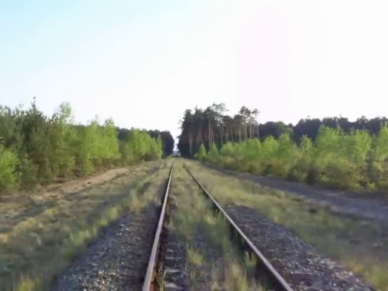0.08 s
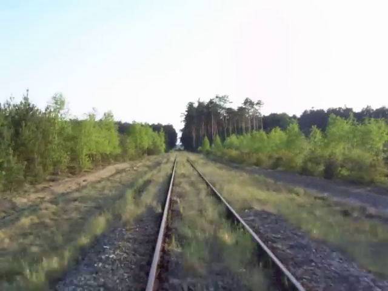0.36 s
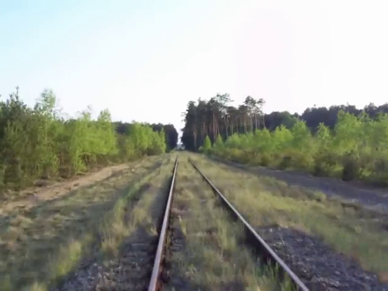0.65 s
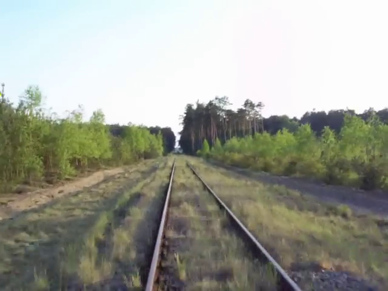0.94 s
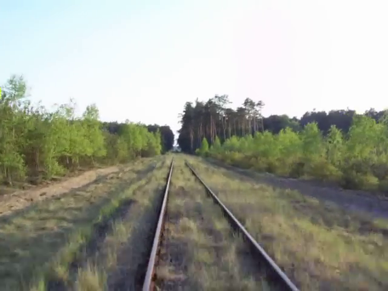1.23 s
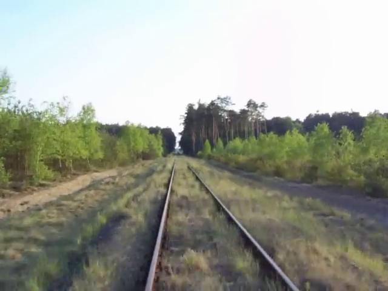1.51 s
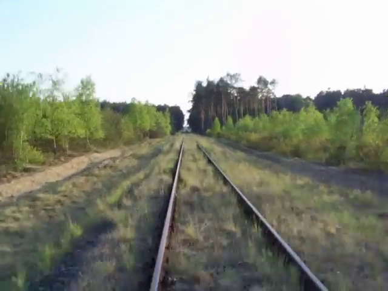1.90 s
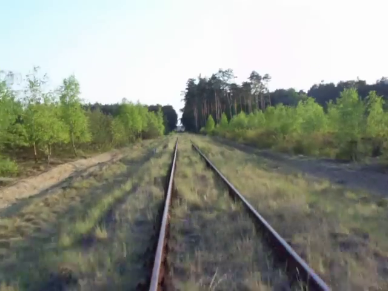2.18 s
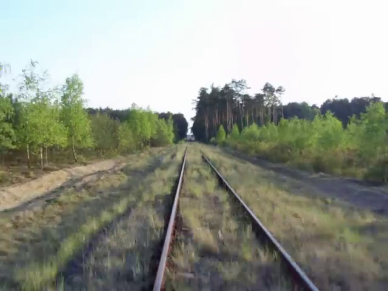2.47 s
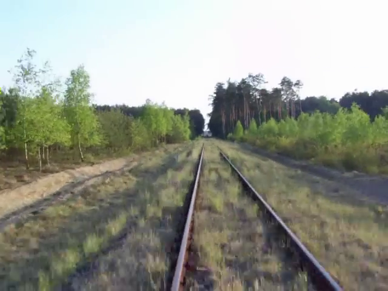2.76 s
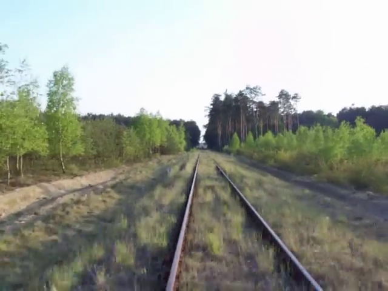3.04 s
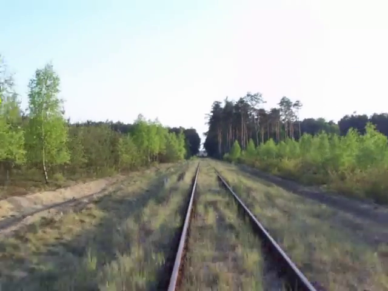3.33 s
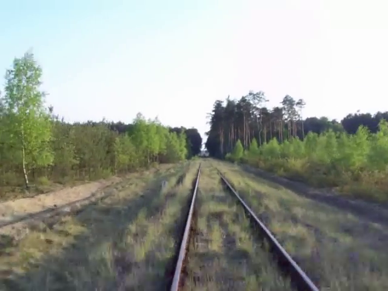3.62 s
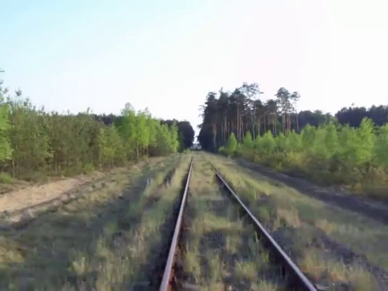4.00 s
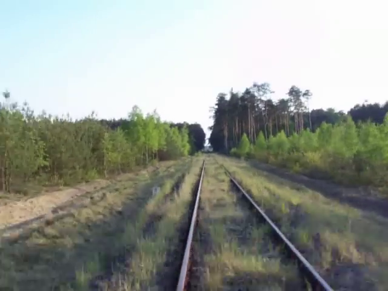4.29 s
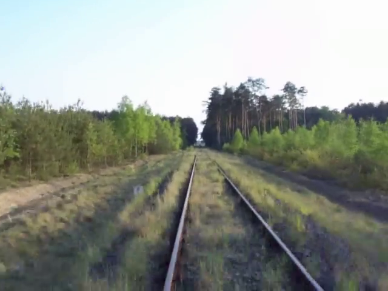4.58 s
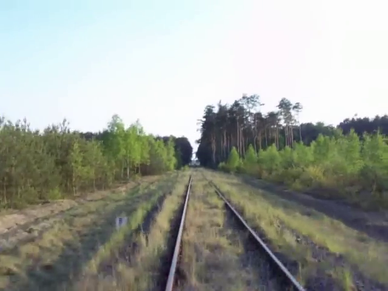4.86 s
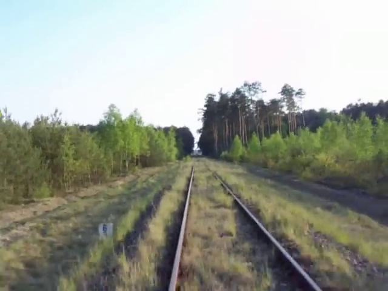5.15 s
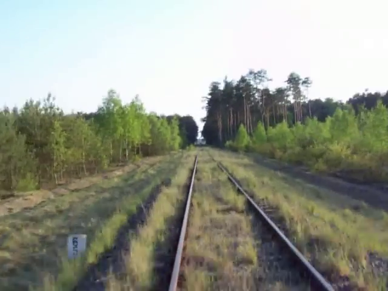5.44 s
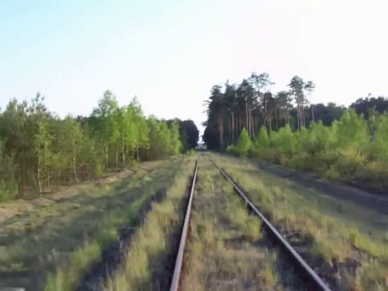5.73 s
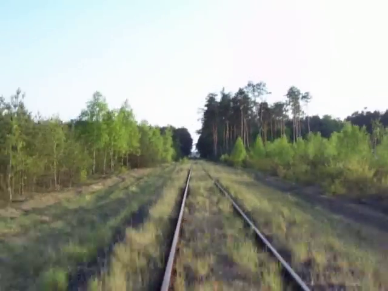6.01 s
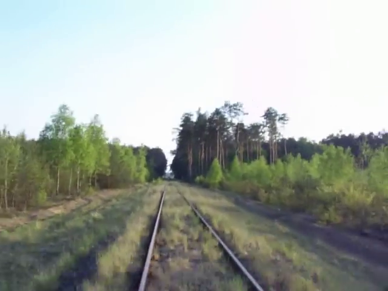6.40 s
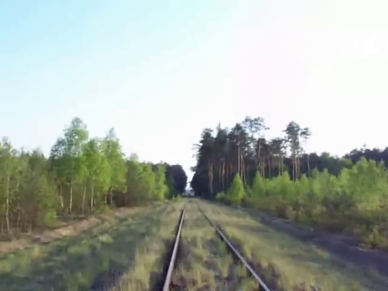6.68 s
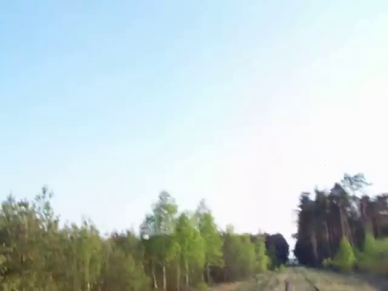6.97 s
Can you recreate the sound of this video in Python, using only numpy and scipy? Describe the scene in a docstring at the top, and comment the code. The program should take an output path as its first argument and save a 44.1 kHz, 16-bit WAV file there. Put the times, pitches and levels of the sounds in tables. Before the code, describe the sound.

Heard from on board, a small motor trolley drones along, then rumbles, knocks and rattles louder over rusty rails.

```python
"""One-cylinder engine of a small motor trolley on an overgrown track, heard from on board.
Exhaust pulses drone through a muffler; block and panels clatter once a turn.
After 2 s the wheels knock onto rough, rusty rail: the chassis bounces, the deck rumbles,
grit cracks and rings the wheels, a flange squeaks, loose parts rattle and clank on the frame."""
import sys
import numpy as np
from scipy import signal
from scipy.fft import rfft, irfft
from scipy.io import wavfile
from scipy.ndimage import uniform_filter1d

SR = 44100
rng = np.random.default_rng(int(sys.argv[2]) if len(sys.argv) > 2 else 0)


def master(y):
    """Save y as 16-bit WAV."""
    cut = np.clip(np.atleast_2d(y).T, -1, 1)
    pcm = np.round(cut * 32767)  # scale
    wavfile.write(sys.argv[1], SR, pcm.astype(np.int16))


N = 309141
T = np.arange(N) / SR
ROUGH_FROM_S = 2.055

# response of wheels and deck (frequency [Hz], gain [dB])
DECK_RESPONSE = [(40, -17), (110, -7), (180, 2), (280, 1.5), (420, 0.5), (700, -3), (930, -4), (1080, -6),
                 (1500, -8), (1900, -11.5), (2700, -25.5), (4000, -36), (9000, -75)]
# uneven stretches of rail (time [s], bounce change [dB], rumble change [dB])
RAIL_HUMPS = [(2.43, 3, 3), (2.52, 3.5, 3.5), (2.82, 5, 2), (3.02, 5, 1), (3.15, -4, 3), (3.32, 5.5, -1),
              (3.8, 8.5, 2), (4.03, 1, 2), (4.45, 3, 2), (5.52, 7.5, 0.5), (5.63, 4, 1), (5.95, 6.5, 2),
              (6.26, 7, 2), (6.42, -4, 11.5), (6.555, 1, 10), (6.74, 8, 2), (6.99, 6, 4.5)]
HUMP_S = 0.082


def undb(db):
    """Decibels to gain."""
    return 10 ** (np.asarray(db) / 20)


def level(x, db=0):
    """Scale to an rms level."""
    return x * undb(db) / np.sqrt(np.mean(x ** 2))


def curve(points):
    """Control signal from (time, value) points."""
    return np.interp(T, *np.transpose(points))


def ramp(start_s, length_s):
    """Linear rise from 0 to 1."""
    return np.clip((T - start_s) / length_s, 0, 1)


def swell(centre_s, length_s):
    """Gaussian rise and fall."""
    return np.exp(-(2 * (T - centre_s) / length_s) ** 2)


def jolt(settle_s=0.1):
    """Shake from meeting the rough rail: 1 until then, settling after."""
    return np.exp(-np.maximum(T - ROUGH_FROM_S, 0) / settle_s)


def walk(rate_hz):
    """Random steps, smoothed twice; unit rms."""
    hold = int(SR / rate_hz)
    steps = np.repeat(rng.standard_normal(N // hold + 1), hold)
    return level(uniform_filter1d(uniform_filter1d(steps, hold), hold)[:N])


def colour(x, response, size=8192):
    """Minimum-phase filter from (frequency [Hz], gain [dB]) points."""
    hz, db = np.transpose(response)
    grid_hz = np.maximum(np.arange(size // 2 + 1) * SR / size, 1)
    gain = undb(np.interp(np.log(grid_hz), np.log(hz), db))
    cepstrum = irfft(np.log(gain))
    cepstrum[1:size // 2] *= 2
    cepstrum[size // 2 + 1:] = 0
    impulse_response = irfft(np.exp(rfft(cepstrum)))
    return signal.fftconvolve(x, impulse_response)[:N]


def ring(x, modes, order=1):
    """Parallel resonances (frequency [Hz], width [Hz], gain [dB]); higher order, steeper flanks."""
    out = np.zeros(N)
    for hz, width_hz, db in modes:
        section = np.concatenate(signal.iirpeak(hz, hz / width_hz, fs=SR))
        out += undb(db) * signal.sosfilt([section] * order, x)
    return out


def impacts(per_s, spread_db):
    """Random tiny impacts, most weak, a few strong; unit rms."""
    size = undb(spread_db * np.minimum(rng.exponential(size=N), 5))
    hits = rng.random(N) < per_s / SR
    return level(hits * size * rng.choice([-1, 1], N))


def once_a_turn(turns, lead_turns, sharpness):
    """Smooth burst just ahead of each exhaust pulse."""
    return np.exp(sharpness * (np.cos(2 * np.pi * (turns + lead_turns)) - 1))


def flange():
    """A flange brushes the rail; a wheel mode sings, wavering with the uneven contact."""
    # flange contacts (time [s], length [s], pitch [Hz], level [dB])
    squeaks = [(2.84, .05, 4726, -41), (2.98, .12, 4726, -40), (5.21, .06, 5155, -41),
               (5.48, .05, 5155, -40), (6.16, .05, 4726, -37), (6.315, .05, 4726, -32),
               (6.435, .06, 4726, -36)]
    out = np.zeros(N)
    for at_s, length_s, hz, db in squeaks:
        phase = 2 * np.pi * np.cumsum(hz + 18 * walk(170)) / SR
        tone = np.sin(phase) * undb(2.1 * walk(90))
        out += level(tone, db) * swell(at_s, length_s)
    return out


def crunches():
    """Coarse grains burst under a wheel in short, bright showers."""
    # grit patches (time [s], length [s], level [dB])
    patches = [(2.135, 0.12, -31), (2.695, 0.034, -36), (3.697, 0.028, -31), (5.077, 0.038, -34),
               (5.297, .02, -34), (5.467, 0.038, -31), (6.267, .08, -34), (6.84, .03, -35)]
    # grain spectrum (frequency [Hz], gain [dB])
    spectrum = [(1500, -29.5), (3500, -25.5), (5200, 6.5), (6000, -1.5), (7300, 2.5), (8200, -6.5)]
    grains = level(colour(impacts(per_s=5600, spread_db=4.5), spectrum))
    return grains * sum(undb(db) * swell(at_s, length_s) for at_s, length_s, db in patches)


def clanks(decay_s=0.0079):
    """Short steel-on-steel chatter rings the upper panels."""
    # loose part hitting the frame (time [s], level [dB])
    hits = [(2.068, -19.5), (4.748, -22.5), (6.51, -24), (6.648, -19), (6.708, -24), (6.778, -24),
            (6.865, -20), (6.888, -19), (6.957, -25)]
    # upper panel modes (frequency [Hz], width [Hz], gain [dB])
    modes = [(1700, 120, -3.0), (2100, 160, -4.0), (2290, 120, 2.0), (3460, 90, -16)]
    chatter = level(ring(impacts(per_s=5000, spread_db=0), modes))
    return chatter * sum((T > at_s) * undb(db) * np.exp(-np.abs(T - at_s) / decay_s) for at_s, db in hits)


def knocks(crack_s=0.0049, thud_s=0.012, thud_hz=78):
    """Each rail bump sends a crack through the deck and a thud through the chassis."""
    # rail bumps (time [s], gain [dB], extra thud gain [dB])
    bumps = [(2.058, -12, 7), (2.34, -11.5, -5), (2.421, -13, -3), (3.155, -16, -9), (3.544, -14.5, 3),
             (3.811, -13, -3), (4.75, -16, 5), (5.021, -12, -10), (5.599, -17, -3), (5.786, -12, -14),
             (6.412, -19, -8), (6.538, -16, -6), (6.99, -14, 1)]
    crack_envelope, thuds = np.zeros(N), np.zeros(N)
    for at_s, db, thud_db in bumps:
        age_s = np.maximum(T - at_s, 0)
        crack_envelope += (T > at_s) * undb(db) * np.exp(-age_s / crack_s)
        thuds += undb(db + thud_db) * np.exp(-age_s / thud_s) * np.sin(2 * np.pi * thud_hz * age_s)
    deck_noise = level(colour(rng.standard_normal(N), DECK_RESPONSE), -1)
    return crack_envelope * deck_noise + undb(-8) * thuds


def rattle(turns):
    """Engine shake throws loose parts against the panels, hardest in one late bout."""
    # struck panel modes (frequency [Hz], width [Hz], gain [dB])
    frame_modes = [(912, 72, 0.5), (1228, 25, 2.5), (1278, 28, 4.5), (1688, 100, 0.5), (2115, 220, 2.5),
                   (2315, 74, -2.5), (2560, 19, -9.5)]
    shake = 1.6 + once_a_turn(turns, lead_turns=0.02, sharpness=1.2)
    taps = impacts(per_s=2600, spread_db=2.0) * shake
    bout = swell(centre_s=6.87, length_s=0.3)
    gain_db = -32.3 + 4 * jolt() + 6.5 * bout + 0.78 * walk(7)
    return level(ring(taps, frame_modes), 2.5) * undb(gain_db)


def grit():
    """Rust and grit crack under the treads and ring the steel wheels."""
    # crushed grit spectrum (frequency [Hz], gain [dB])
    spectrum = [(300, -10.5), (1500, 3.5), (2600, -2), (2900, 1.5), (3600, 3), (3900, -1.5), (4400, 1.5),
                (5100, 0), (5500, -3.5), (6200, -7), (7300, -14), (8000, -15.5), (9000, -18.5)]
    # wheel modes (frequency [Hz], width [Hz], gain [dB])
    wheel_modes = [(1240, 16, 8.5), (2670, 29, -7), (3520, 35, -5), (4726, 20, 1), (4949, 25, -4),
                   (5156, 16, 1.5), (6336, 25, -8), (6900, 100, -7.5), (7250, 100, -7)]
    # grit along the rail (time [s], gain [dB])
    amount = [(2.2, -33), (2.85, -31), (3.3, -32.5), (3.7, -32), (4.1, -34), (5.0, -32), (5.85, -31.5),
              (6.26, -27.5), (6.35, -32), (6.79, -35), (6.86, -30), (7.0, -34.5)]
    cracks = impacts(per_s=12000, spread_db=3.0) * undb(1.7 * walk(60))
    wheel_hits = impacts(per_s=3000, spread_db=6.5) * undb(1.3 * walk(12))
    crackle = level(colour(cracks, spectrum))
    ringing = level(ring(wheel_hits, wheel_modes), -6)
    return (crackle + ringing) * undb(curve(amount) + 0.35 * walk(12))


def bounce():
    """Pitted rail bounces the chassis; the first jolt and the humps vary the level."""
    # chassis response (frequency [Hz], gain [dB])
    chassis_response = [(15, -26), (30, -16.5), (50, -11), (80, -2), (150, 2.5), (220, -14), (400, -25.5),
                        (2000, -70.5)]
    humps_db = sum(db * swell(at_s, HUMP_S) for at_s, db, _ in RAIL_HUMPS)
    level_db = -31 + 4.5 * jolt() + humps_db + 1.2 * walk(10)
    pits = impacts(per_s=990, spread_db=2.0)
    return level(colour(pits, chassis_response)) * undb(level_db)


def rumble():
    """Rail pits shake wheels and deck, less where the rail turns smoother."""
    humps_db = sum(db * swell(at_s, HUMP_S) for at_s, _, db in RAIL_HUMPS)
    smooth_rail = ramp(start_s=6.29, length_s=0.12)
    gain_db = -24.1 - 7 * smooth_rail + humps_db + 0.8 * walk(14)
    pits = impacts(per_s=3500, spread_db=3.0) * undb(walk(35))
    return level(colour(pits, DECK_RESPONSE), 1.14) * undb(gain_db)


def firings(turns, jitter_s=0.00014, scatter_db=0.96):
    """One pulse a turn, scattered in time and strength."""
    count = np.arange(1, int(turns[-1]))
    timing, strength = rng.standard_normal((len(count), 2)).T
    at_s = np.interp(count, turns, T) + jitter_s * timing
    pulses = np.zeros(N)
    pulses[np.clip(at_s * SR, 0, N - 1).astype(int)] = undb(scatter_db * strength)
    return pulses


def tailpipe(x, hz, width_hz):
    """All-pass: the pipe delays the band at its resonance, so each pulse builds and lingers."""
    return x - 2 * ring(x, [(hz, width_hz, 0)])


def exhaust(turns, mean_firing_hz):
    """Firing pulses boom through muffler and tailpipe."""
    # muffler response (frequency [multiple of firing rate], gain [dB])
    muffler = [(1, -23.5), (2, -21.5), (3, -15.5), (4, -6.5), (5, 1), (6, -11), (7, -11.5), (8, -18.5),
               (9, -27), (10, -13), (11, -18.5), (12, -30.5)]
    with_skirts = [(0.4, -36.5), *muffler, (22, -43.5), (60, -90.5)]
    response = [(multiple * mean_firing_hz, db) for multiple, db in with_skirts]
    pulses = firings(turns) * undb(0.24 * walk(12))
    return level(tailpipe(colour(pulses, response), hz=337, width_hz=530), -0.96)


def clatter(turns):
    """Piston and valves clatter in block and panels; no two turns alike."""
    # engine block response (frequency [Hz], gain [dB])
    block_response = [(25, -14), (65, -9), (110, -5), (160, 3), (240, -1), (420, -1), (660, -3),
                      (1050, -13), (1900, -15), (2700, -25), (3650, -22), (3900, -27), (5500, -32),
                      (7500, -34)]
    # engine and frame panel modes (frequency [Hz], width [Hz], gain [dB])
    panel_modes = [(840, 90, -1), (925, 80, 0), (1218, 55, 3), (1295, 75, 0), (1485, 55, 0),
                   (1570, 100, -2), (1670, 130, 1), (1803, 35, -4), (2090, 230, -6), (2300, 170, -3.5),
                   (3280, 150, -13), (3490, 80, -13), (4720, 60, -23)]
    strokes = 0.75 + 0.42 * once_a_turn(turns, lead_turns=0.071, sharpness=3.0)
    strokes *= undb(0.7 * walk(40) + 0.5 * walk(9))
    block = colour(strokes * impacts(per_s=12000, spread_db=1.2), block_response)
    panels = ring(strokes * impacts(per_s=6000, spread_db=2.5), panel_modes, order=2)
    return level(block, -11.7) + level(panels, -14.5)


def engine(turns, mean_firing_hz):
    """Exhaust plus clatter; the level sinks quickly as the rough rail begins."""
    gain_db = -16 - 5.5 * ramp(ROUGH_FROM_S, length_s=0.07)
    return (exhaust(turns, mean_firing_hz) + clatter(turns)) * undb(gain_db)


def scene():
    """Engine and wheels, close by in open air; mono."""
    # engine speed (time [s], firing rate [Hz])
    speed = [(0, 44.8), (.7, 45.2), (1.1, 45.1), (2, 44.7), (3.4, 44.95), (5.4, 44.95), (6.7, 44.7),
             (7.01, 45)]
    firing_hz = curve(speed) * (1 + 0.0041 * walk(14))  # slight hunting
    turns = np.cumsum(firing_hz) / SR
    drone = engine(turns, np.mean(firing_hz))
    rolling = ramp(ROUGH_FROM_S, length_s=0.016) * (bounce() + rumble() + grit() + rattle(turns))
    return (drone + rolling + knocks() + clanks() + crunches() + flange())[None]


def record(dry, treble_hz=6940, top_hz=8850):
    """Small camera microphone: rounds the peaks, dulls the treble, cuts the top."""
    rounded = np.tanh(0.75 * dry) / 0.67
    dull = signal.sosfilt(signal.cheby1(5, 0.5, treble_hz, fs=SR, output="sos"), rounded)
    return signal.sosfilt(signal.ellip(10, 0.2, 80, top_hz, fs=SR, output="sos"), dull)


dry = scene()
out = record(dry)
master(out)
```